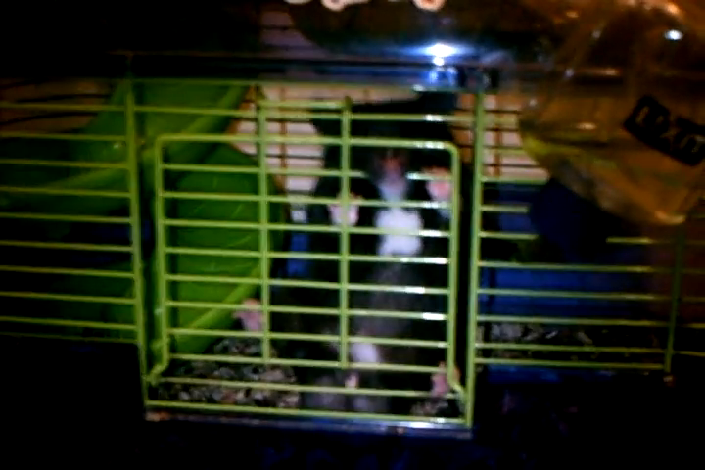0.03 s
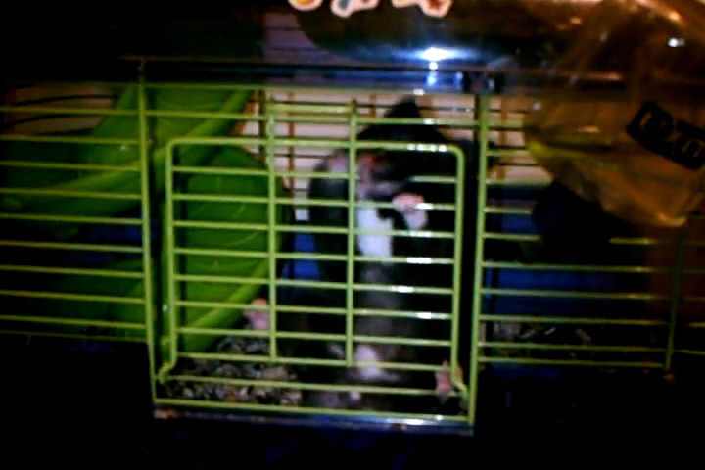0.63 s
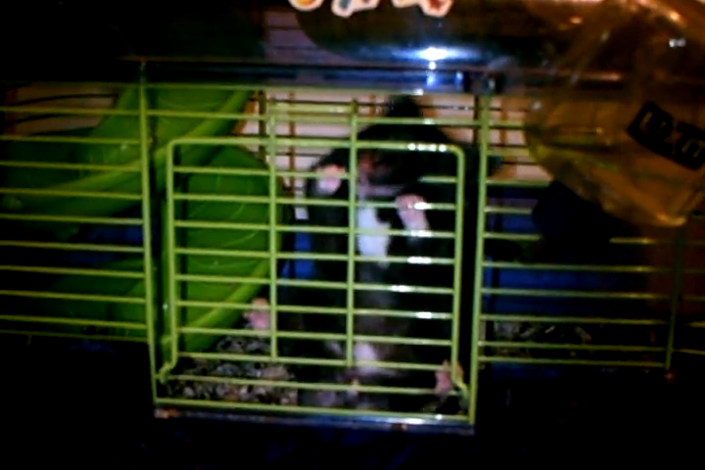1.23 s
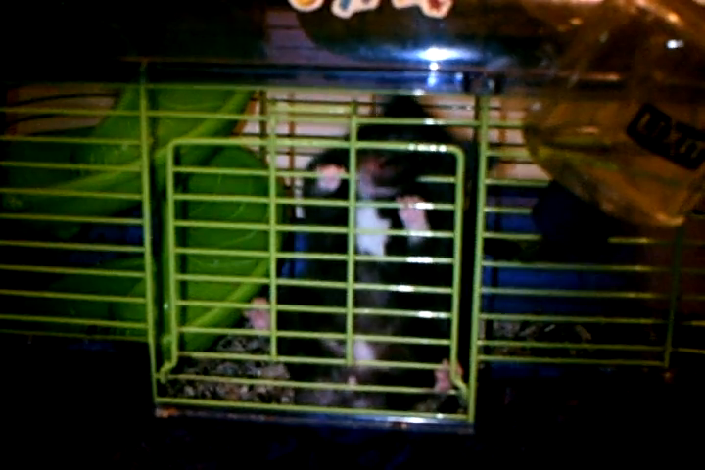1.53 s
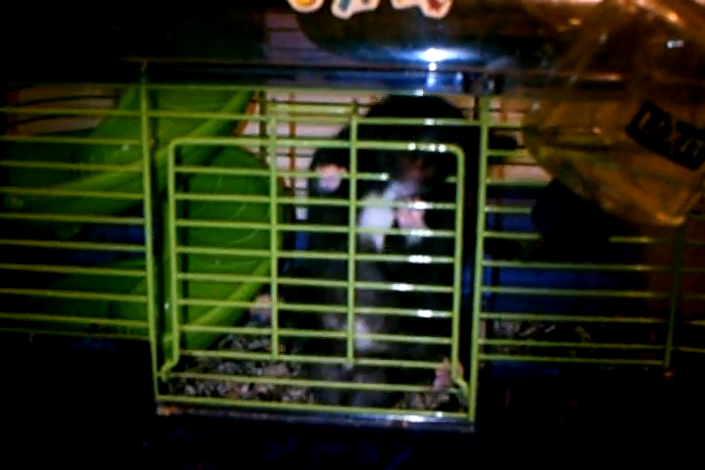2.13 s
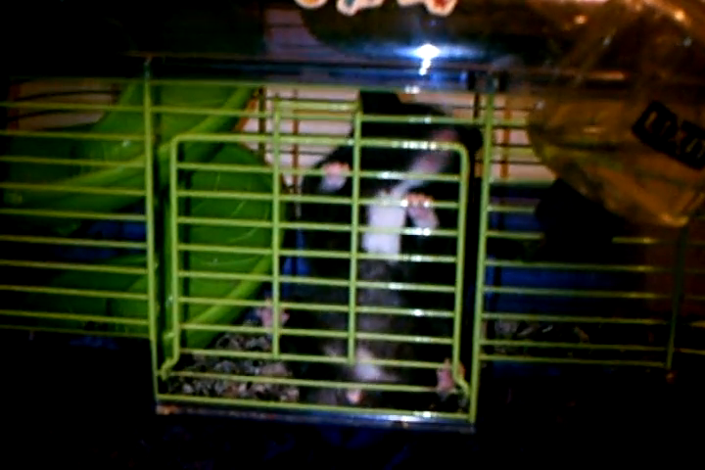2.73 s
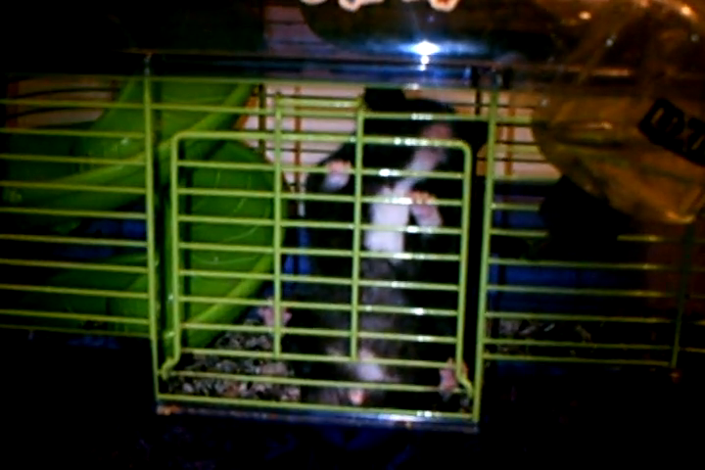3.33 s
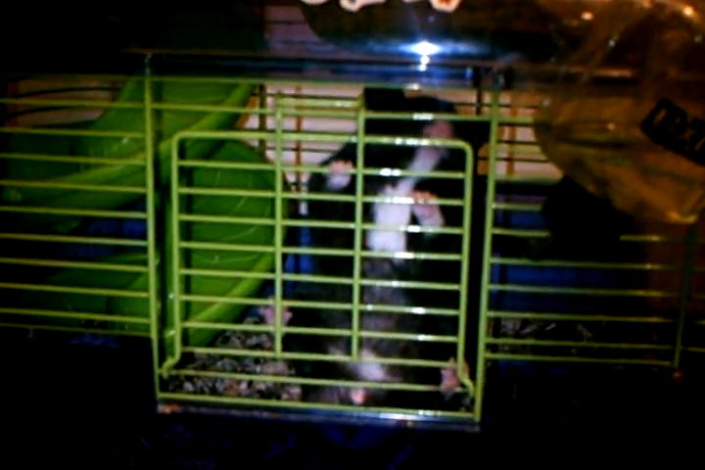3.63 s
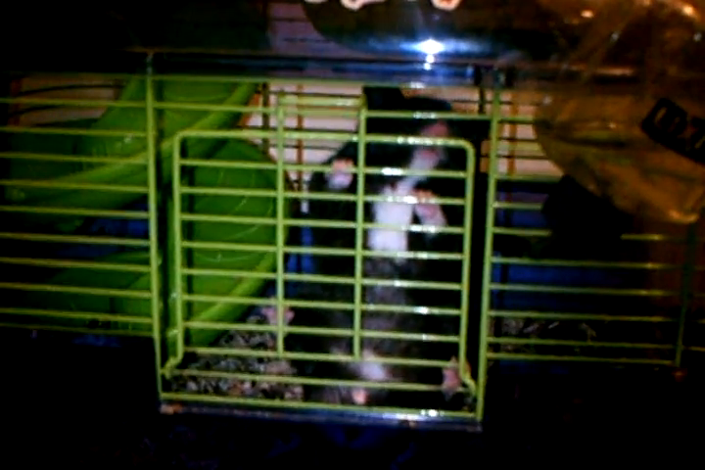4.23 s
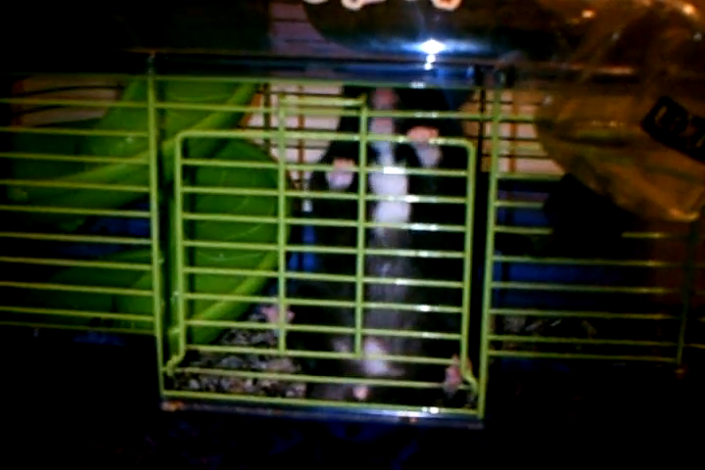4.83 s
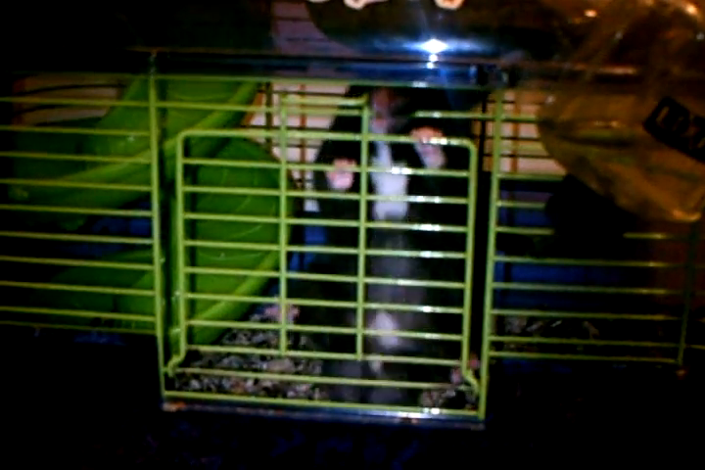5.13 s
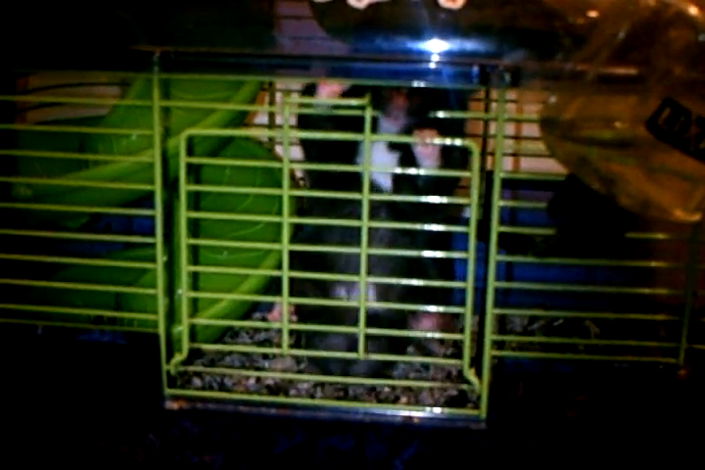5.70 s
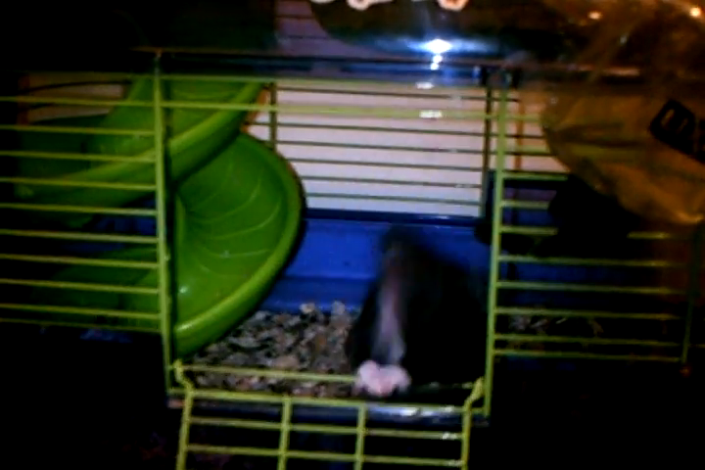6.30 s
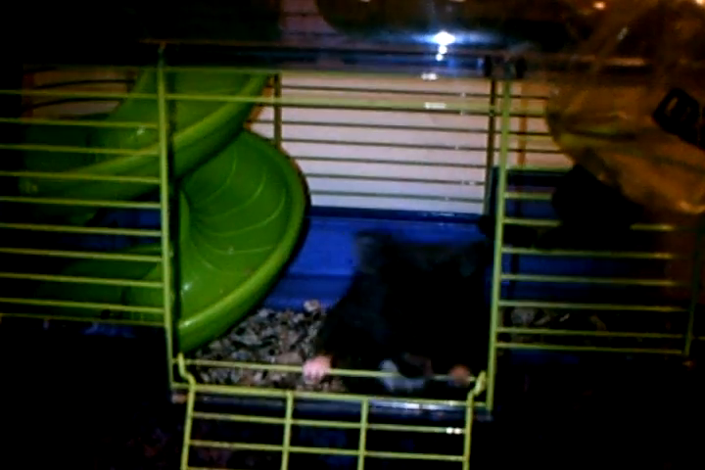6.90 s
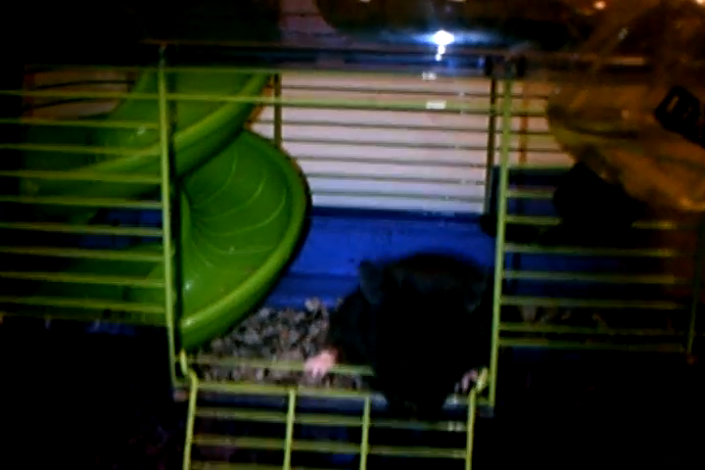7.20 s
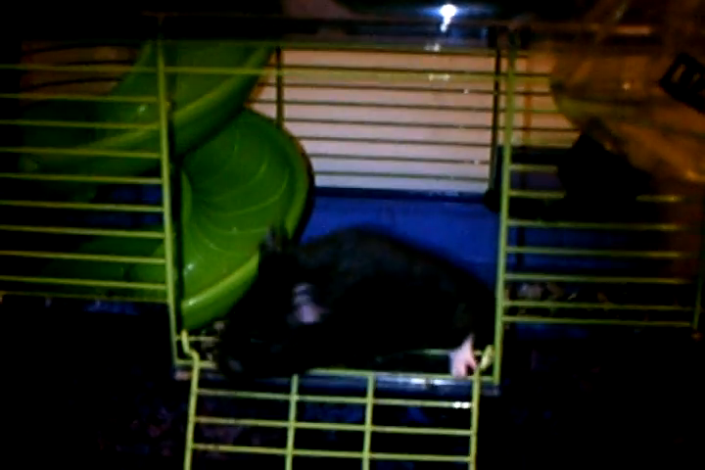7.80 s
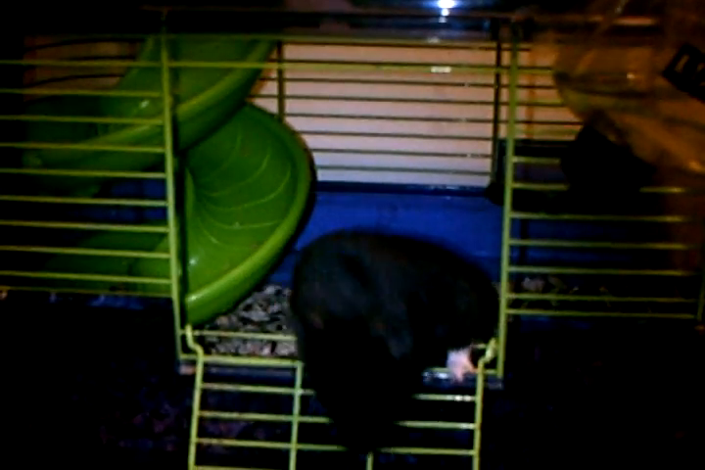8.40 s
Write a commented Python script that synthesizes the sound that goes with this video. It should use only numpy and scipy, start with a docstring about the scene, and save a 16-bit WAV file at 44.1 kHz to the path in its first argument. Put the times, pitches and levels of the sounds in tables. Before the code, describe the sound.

A quiet room's hiss, low hum and thin whine run throughout. For the first two and a half seconds a pet rodent nibbles and claws at cage bars in faint, gritty scrapes that ring the metal slightly. A dry snap comes at about 2.5 seconds, then a lull with a couple of small ticks. From around 4.5 seconds fur brushes the wires, paws stir the bedding, and the door ticks against its catch more and more often. At 6.2 seconds the wire door drops open with a loud metallic clatter, bouncing and rattling until about 6.8 and overloading the close microphone. The wires ring on for a second or two, and wire rubs on wire in brief high squeaks near 6.8 and 7.2 seconds. The animal keeps shuffling and brushing the bars, with a few light ticks and scrapes, until about 8.6 seconds.

```python
"""A wire cage door drops open, bounces and rattles, overloading a small camera's microphone close by. Before
the crash a pet rodent nibbles and paws at it: gritty scrapes ring the bars, the door ticks. Each blow sets the
grid chattering, and the hardest leaves free wires singing on. The animal then shuffles about in the opening;
the hinge squeaks and wire rubs on wire. Under it all lies the quiet room's bed of hiss, hum and thin whine."""
import sys
import numpy as np
from scipy import signal
from scipy.fft import rfft, irfft, next_fast_len
from scipy.io import wavfile
from scipy.ndimage import map_coordinates

SR = 44100
rng = np.random.default_rng(int(sys.argv[2]) if len(sys.argv) > 2 else 0)


def waveform_to_disk(signal):
    """Save audio, clipped to [-1, 1], as 16-bit WAV at the path in sys.argv[1]."""
    frames = np.transpose(np.atleast_2d(signal))
    scaled = np.clip(frames, -1, 1) * 32767
    samples = np.round(scaled).astype(np.int16)
    wavfile.write(sys.argv[1], SR, samples)


N = 377055

# Noise colours. Each row: frequency in Hz, relative level in dB.
HISS_EQ = [(12, -35.5), (20, 2), (32, -6), (86, -7.5), (110, -9.5), (124, -9.5), (143, -5), (173, -11),
           (215, -10), (442, -15.5), (931, -17.5), (1740, -20), (4020, -21), (4430, -15.5), (6200, -37.5),
           (8060, -79), (13600, -120)]
GRIT_EQ = [(150, -12.5), (420, -13.5), (620, -2.5), (800, -8), (1020, -6), (1350, -12.5), (1830, -2.5),
           (2200, -6), (2700, -7.5), (3100, -6), (3500, -11.5), (4400, -5), (5800, -19.5)]  # teeth and claws
BRUSH_EQ = [(700, -19.5), (1600, -17.5), (3000, -9.5), (3600, -5), (4100, -1.5), (4600, 0), (5200, -9),
            (5900, -22)]  # fur on wires
SCRAPE_EQ = [(1000, -26.5), (1700, -6.5), (2100, -5.5), (2400, 0.5), (2550, -8.5), (2750, -2), (3200, -14),
             (4200, -18.5)]  # rubbing on a bar
BEDDING_EQ = [(88, -39), (150, -3.5), (168, -4.5), (298, -4), (363, -8), (556, -6), (1800, -14.5),
              (2340, -41.5), (3960, -120)]
CLICK_EQ = [(200, -13.5), (900, -14), (1800, -8.5), (2600, -5), (3400, -6.5), (4300, 5.5), (5000, -6),
            (5900, -20.5)]  # the bright top of a door tick
KNOCK_EQ = [(120, -12.5), (300, -7.5), (700, 4.5), (1200, -5), (2000, -7), (4000, -21)]  # its hollow body
CLATTER_EQ = [(24, -43.5), (40, -6.5), (87, -15.5), (264, -15), (299, -10), (339, -15), (948, -12),
              (1410, -15), (2150, -9), (2440, -11.5), (3410, -10), (4290, -6), (4570, -7.5), (6000, -21.5),
              (7800, -50.5), (13200, -120)]  # the struck grid
# Hum and whine. Each row: pitch in Hz, level in dB, pitch wander in Hz.
STEADY_TONES = [(143, -46, 2.03), (4310, -45.5, 0.93)]

# Resonances. Each row: pitch in Hz, relative level in dB, seconds to fall 60 dB before extra damping.
BAR_MODES = [(586, -6.5, 0.45), (664, -11, 0.61), (977, -6.5, 0.43), (1267, -8, 0.34), (1800, -2.5, .22),
             (1847, -11, 0.28), (2380, -8.5, 0.1), (3170, -4.5, 0.15)]  # the gnawed bar and its tray
SNAP_MODES = [(1860, -11, 0.022), (2680, -1, 0.018), (3300, 7.5, 0.0049), (4240, -3, 0.025)]
HELD_DOOR_MODES = [(2530, -5.5, 0.12), (2680, -15.5, .12), (2970, -3, .12), (4140, -0.5, .13),
                   (4350, -3.5, 0.142), (4420, -4, .13), (4530, -2, .12), (5050, -17.5, .1)]  # paws hold the door
FREE_DOOR_MODES = [(657, -14, .3), (1250, -14, .3), (2122, -7, .3), (2640, -12, .35), (2933, -8, .24),
                   (3257, -14, .3), (3655, -14, .25), (3790, -11, .33), (3985, -5, .25), (4139, 1, .36),
                   (4194, -2.5, .46), (4233, -4, .36), (4420, -2, .36), (4537, -2, .38), (4621, -1, .36),
                   (4727, -2.5, .33), (4852, -10, .35)]  # the strongest modes of the loose door
WIRE_MODES = [(77, -39, 7.3), (148, -47.5, 4), (329, -39.5, 6.5), (357, -45, 9.4), (807, -38.5, 8),
              (923, -35.5, 3.4), (940, -40, 6.1), (1240, -38, 5.3), (1335, -41.5, 4.1), (1640, -36, 2.6),
              (1980, -41.5, 3.7), (2440, -40, 3.6), (2510, -34.5, 2.6), (2550, -40, 2.44), (3370, -36, 3),
              (3578, -37.5, 3.3), (4700, -29, 2.3), (5030, -35, 2.1)]  # freely swinging wires
# The rattling grid's tail. Each row: frequency in Hz, seconds to fall 60 dB.
GRID_DECAY = [(100, 0.27), (700, 0.27), (2500, 0.21), (4400, 0.34), (6000, 0.18)]

# Teeth and claws on the bars. Each row: start in seconds, relative level in dB, treble trim in dB.
BITES = [(0.107, -18, -9), (.117, -14, -11), (.405, -19.5, 2), (.837, -18, 1), (.949, -16.5, -17),
         (1.091, -13.5, -14), (1.217, -17, -10), (1.323, -11.5, -6), (1.474, -14, -13), (1.598, -13.5, -13),
         (1.623, -23.5, 3), (1.702, -16, -12), (1.819, -12.5, -14), (1.942, -15, -18), (1.955, -16, -4),
         (2.126, -19, -6), (2.188, -19, -7), (2.427, -21, -12), (5.23, -15, -12), (5.455, -23, -16),
         (7.93, -25, 0), (8.212, -23, -1), (8.52, -20, -8)]
# Fur and paws sweep the wires. Each row: peak time in seconds, level in dB, length in seconds,
# bar scrape in dB against the brushing.
FUR_STROKES = [(.56, -42.5, 0.19, -3), (1.762, -40.5, 0.067, -10), (1.914, -37, 0.28, -9),
               (3.45, -47, .15, -9), (4.21, -42, 0.17, -10), (4.68, -38.5, 0.42, -13.5),
               (4.816, -38, 0.12, -5), (5.134, -31, 0.2, -10), (5.319, -31.5, 0.16, -12.5),
               (5.819, -29.5, .08, -10), (5.904, -31.5, .07, -14), (7.147, -36.5, 0.4, -4),
               (7.532, -38, 0.098, -5.5), (7.825, -29, 0.11, -3), (7.958, -28.5, .19, -4.5),
               (8.186, -45, 0.2, -15), (8.344, -26.5, .1, -3), (8.475, -33.5, 0.068, 3)]
# Paws in the bedding. Each row: peak time in seconds, level in dB, length in seconds.
PAW_SHUFFLES = [(.55, -47, 0.17), (1.237, -41, 0.17), (1.65, -42, 0.51), (2.065, -44.5, .3),
                (4.23, -45, .1), (4.555, -45, 0.19), (5.095, -34.5, 0.14), (5.261, -35.5, 0.22),
                (5.796, -43.5, 0.31), (6.15, -45, 0.16), (7.067, -33.5, 0.29), (7.48, -41.5, 0.38),
                (7.89, -39, 0.13), (8.12, -45, 0.36), (8.422, -43.5, 0.38)]
# Jolts to the microphone. Each row: start in seconds, step as a share of full scale, push in seconds.
MIC_JOLTS = [(2.488, -0.073, .003), (2.69, 0.07, .005), (5.89, -0.078, .01), (6.05, -0.087, .006),
             (6.15, 0.068, .015), (6.221, -0.53, .038), (6.365, -0.12, .025), (6.78, 0.44, .26),
             (7.305, 0.081, .01)]
# One dry snap. Its row: start in seconds, relative level in dB.
SNAP_CUES = [(2.49, -6.5)]
# The door shifts in its frame. Each row: start in seconds, then relative level, ring and knock in dB.
DOOR_TICKS = [(2.585, -26.5, 0, -20), (3.26, -26.5, -4, -13), (4.822, -20, -3, -33),
              (5.0722, -16.5, -11, -17), (5.586, -19.5, 6, -20), (5.6044, -25, 7, -15),
              (5.661, -17.5, 7.5, -17), (5.752, -17.5, 0, -17), (5.7863, -16.5, 4, -17),
              (5.881, -18.5, 1, -21), (5.8967, -15.5, -10, -21), (6.0027, -13, 3, -13), (6.0477, -9, 2, -6),
              (6.1305, -19.5, -13, -15), (7.1053, -19, -11.5, -26), (7.651, -16.5, -2, -22),
              (8.1557, -28, 11, -20), (8.3151, -20.5, -5, -12)]
# The door hits the cage. Each row: start in seconds, relative level in dB, low-end boost in dB.
DOOR_BLOWS = [(6.214, -16.5, 6), (6.2186, -7, 5.5), (6.23, -6.5, 1), (6.2922, -10.5, 5.5),
              (6.3598, 0, -2.5), (6.468, -20, -0.5), (6.5135, -28, 1), (6.5578, -2.5, -5.5),
              (6.657, -6, -9.5), (6.672, -11, -2.5)]
# Squeaks of the hinge and of wire rubbing on wire. Each row: start in seconds, pitch in Hz, level in dB, #
# swell in seconds, seconds to fall 60 dB.
SQUEAK_CUES = [(6.785, 3240, -34, 0.027, 1), (6.79, 4980, -36.5, .02, 0.63),
               (7.104, 4850, -31, 0.0045, .13), (7.104, 2960, -30.5, 0.0043, 0.087),
               (7.148, 3630, -20, 0.025, 0.17), (7.162, 3760, -29, 0.017, 0.11),
               (7.196, 3575, -25.5, 0.019, .26)]


def amp(db):
    """Decibels to gain."""
    return 10 ** (np.asarray(db) / 20)


def unit(x):
    """Scale to rms 1."""
    return x / np.sqrt(np.mean(x ** 2) + 1e-20)


def along(points, hz):
    """Read a curve of (Hz, value) points on a log frequency axis."""
    freqs, values = np.transpose(points)
    return np.interp(np.log(hz + 1), np.log(freqs + 1), values)


def wobble(rate):
    """Smooth random modulation, with rate new values a second."""
    return map_coordinates(rng.standard_normal(int(N * rate / SR) + 4), [np.arange(N) * rate / SR])


def filtered(x, response):
    """EQ x with a gain given as a function of Hz."""
    size = next_fast_len(len(x) + SR // 4)
    return irfft(rfft(x, size) * response(np.fft.rfftfreq(size, 1 / SR)), size)[:len(x)]


def noise(length, eq, grain=1):
    """Noise roughened by the gain curve grain, then coloured by eq, at rms 1."""
    return unit(filtered(rng.standard_normal(length) * grain, lambda hz: amp(along(eq, hz))))


def add(track, start, sound):
    """Mix a sound into the track, start seconds in."""
    part = track[round(start * SR):][:len(sound)]
    part += sound[:len(part)]


def ring(modes, t, scatter_db):
    """Damped modes, struck at new strengths and phases."""
    out = np.zeros(len(t))
    for hz, db, t60 in modes:
        level = amp(db + scatter_db * rng.standard_normal() - 60 * t / t60)
        out += level * np.sin(2 * np.pi * (hz * t + rng.random()))
    return out


def attack(t, rise_s):
    """An exponential fade-in."""
    return 1 - np.exp(-t / rise_s)


def contact(t, hold_s, t60):
    """A sharp attack, held while the surfaces touch, then a decay."""
    return attack(t, 0.00045) * amp(-60 * np.maximum(t - hold_s, 0) / t60)


def movement(peak_s, length, skew=0.1, edge_db=8.5):
    """A swell and a slightly slower fade, edge_db down at the ends of its length."""
    offset = 2 * (np.arange(N) / SR - peak_s) / length
    distance = np.abs(offset / (1 + skew * np.sign(offset)))
    return amp(-edge_db * np.minimum(distance, 9) ** 1.23)


def room_tone():
    """Even hiss, a wavering hum and a thin electronic whine."""
    out = amp(-37.5) * noise(N, HISS_EQ)
    for hz, db, wander_hz in STEADY_TONES:
        level = np.sqrt(2) * amp(db + 0.68 * wobble(5.7))
        out += level * np.sin(2 * np.pi * np.cumsum(hz + wander_hz * wobble(14)) / SR)
    return out


def nibbles(mouth_damping_db_per_s=111.5):
    """Short gritty scrapes of teeth and claws, each ringing the bar while the mouth damps it."""
    out, t = np.zeros(N), np.arange(SR // 3) / SR
    for start, db, treble_db in BITES:
        grit = noise(len(t), GRIT_EQ, grain=amp(3.1 * rng.standard_normal(len(t))))
        grit = filtered(grit, lambda hz: amp((treble_db + 2.5) * hz ** 2 / (hz ** 2 + 3000 ** 2)))
        grit *= contact(t, hold_s=0.0053, t60=0.105)
        detune = 1 + 0.04 * rng.standard_normal()  # each bite grips the bar differently
        bar = ring(BAR_MODES, detune * t, scatter_db=1.5) * attack(t, 0.002)
        bar *= amp(-8.5 - mouth_damping_db_per_s * t)
        add(out, start, amp(db - 11.5) * (grit + bar))
    return out


def bedding_shuffle():
    """Paws stir the bedding in dull, grainy swells."""
    bedding = noise(N, BEDDING_EQ, grain=amp(2 * wobble(120)))
    return bedding * sum(amp(db) * movement(peak_s, length) for peak_s, db, length in PAW_SHUFFLES)


def claws(taps_per_s=25):
    """Claws catch at random: tiny taps, some stronger than others."""
    out, t = np.zeros(N), np.arange(SR // 20) / SR
    for when, softness in rng.random((int(taps_per_s * N / SR), 2)):
        tap = noise(len(t), GRIT_EQ) * contact(t, hold_s=0.001, t60=0.02)
        add(out, when * N / SR, amp(1 - 10 * softness) * tap)
    return out


def fur_strokes():
    """Fur and paws slide in dense tiny slips: bright along the wires, nasal on a bar."""
    slips = amp(3.5 * np.tanh(wobble(900)) + 2.0 * np.tanh(wobble(70)))  # friction caps a slip's size
    brush = noise(N, BRUSH_EQ, grain=slips) + claws()
    scrape = noise(N, SCRAPE_EQ, grain=slips)
    return sum(amp(db) * movement(peak_s, length) * (brush + amp(scrape_db) * scrape)
               for peak_s, db, length, scrape_db in FUR_STROKES)


def mic_sway(recovery_s=0.16):
    """Jolts push the microphone's baseline aside and it creeps back, mostly below hearing."""
    out, t = np.zeros(N), np.arange(2 * SR) / SR
    for start, step, push_s in MIC_JOLTS:
        push = np.minimum(t / push_s, 1) ** 1.37
        recovery = np.exp(-np.maximum(t - push_s, 0) / recovery_s)
        add(out, start, step * push * recovery)
    return out


def snap():
    """A dry snap: a few bright modes start together and die almost at once."""
    out, t = np.zeros(N), np.arange(SR // 3) / SR
    crack = sum(amp(db - 60 * t / t60) * np.sin(2 * np.pi * hz * t) for hz, db, t60 in SNAP_MODES)
    for start, db in SNAP_CUES:
        add(out, start, amp(db - 10.5) * crack)
    return out


def door_ticks():
    """The door taps its frame: a click, a knock and a short ring choked by paws."""
    out, t = np.zeros(N), np.arange(SR // 3) / SR
    for start, db, ring_db, knock_db in DOOR_TICKS:
        crack_and_tail = contact(t, hold_s=0, t60=0.02) + contact(t, hold_s=0.0048, t60=0.15)
        click = noise(len(t), CLICK_EQ) * crack_and_tail
        metal = amp(ring_db - 8.5) * ring(HELD_DOOR_MODES, t, scatter_db=2.5) * attack(t, 0.001)
        knock = amp(knock_db + 6.5) * noise(len(t), KNOCK_EQ) * contact(t, hold_s=0.0027, t60=0.19)
        add(out, start, amp(db - 13) * (click + metal + knock))
    return out


def door_crash(chatter_s=0.0045, settle_s=6.72, frame_damping_db_per_s=109):
    """Each blow chatters, exciting the grid's countless close modes and a few strong ones."""
    out, t = np.zeros(N), np.arange(SR) / SR
    for start, db, low_db in DOOR_BLOWS:
        grid = filtered(noise(SR, CLATTER_EQ), lambda hz: amp(low_db / (1 + (hz / 1800) ** 2)))
        band_hz, frame_s, bands = signal.stft(grid, SR, nperseg=256)
        fade_db = -60 * np.maximum(frame_s - chatter_s, 0) / along(GRID_DECAY, band_hz)[:, None]
        clatter = signal.istft(bands * amp(fade_db), SR, nperseg=256)[1][:SR]
        clang = ring(FREE_DOOR_MODES, t, scatter_db=4.0) * attack(t, chatter_s)
        blow = amp(db - 3.5) * clatter + amp(-17 + 0.51 * db) * clang  # soft blows ring, hard ones crash
        add(out, start, blow * attack(t, 0.00027))
    settling_db = -frame_damping_db_per_s * np.maximum(np.arange(N) / SR - settle_s, 0)
    buzz_db = 0.71 * wobble(220)  # loose wires buzz against each other
    return out * amp(settling_db + buzz_db)


def singing_wires():
    """The hardest blow leaves lightly damped wires singing and beating for a second or two."""
    out, t = np.zeros(N), np.arange(3 * SR) / SR
    start = max(DOOR_BLOWS, key=lambda blow: blow[1])[0]
    singing = sum(ring([mode], t, scatter_db=1.0) * amp(3.8 * wobble(18.2)[:len(t)])
                  for mode in WIRE_MODES)
    damping_db = -18 * np.maximum(t - 1.15, 0)  # the animal leans on the wires and stills them
    add(out, start, singing * amp(damping_db) * attack(t, 0.19))
    return out


def squeaks():
    """Stick and slip swells one mode of the hinge or a wire unevenly, then lets it die away."""
    out, t = np.zeros(N), np.arange(SR // 2) / SR
    for start, hz, db, swell_s, t60 in SQUEAK_CUES:
        phase = 2 * np.pi * np.cumsum(hz + 22 * wobble(190)[:len(t)]) / SR
        swell = np.minimum(t / swell_s, 1) ** 2
        flutter_db = 6.7 * np.tanh(wobble(150)[:len(t)])
        fade_db = -60 * np.maximum(t - swell_s, 0) / t60
        add(out, start, swell * amp(db + flutter_db + fade_db) * np.sin(phase))
    return out


def scene():
    """The mono mix at the microphone; the sway makes the overload lopsided."""
    mix = room_tone() + nibbles() + bedding_shuffle() + fur_strokes() + mic_sway()
    mix += snap() + door_ticks() + door_crash() + singing_wires() + squeaks()
    return mix[None]


def record(dry, band_hz=5750, ceiling=0.73, top_hz=15900):
    """A narrow-band camera input that clips: only the overload's crunch reaches the high treble."""
    narrow = filtered(dry[0], lambda hz: 1 / np.sqrt(1 + (hz / band_hz) ** 70))
    clipped = np.clip(narrow, -ceiling, ceiling)
    return filtered(clipped, lambda hz: 1 / np.sqrt(1 + (hz / top_hz) ** 200))[None]


dry = scene()
out = record(dry)
waveform_to_disk(out)
```